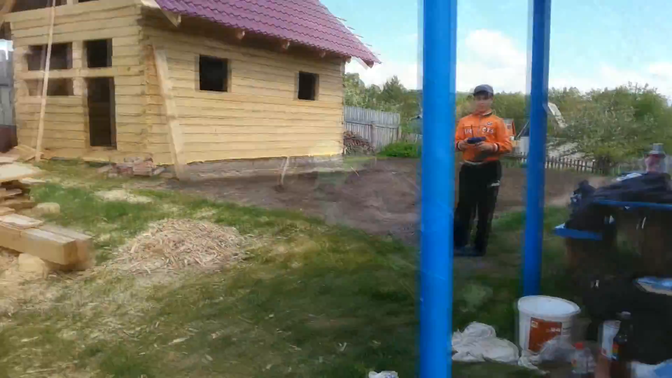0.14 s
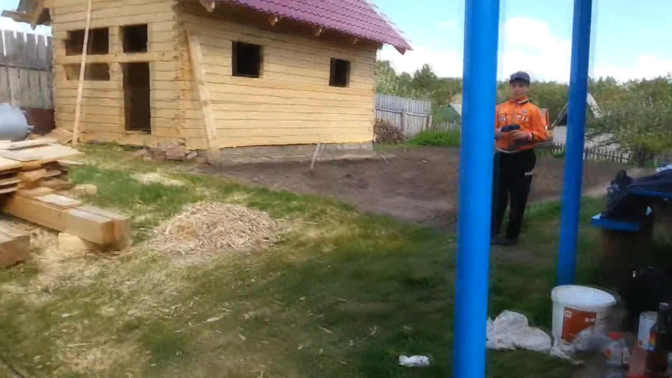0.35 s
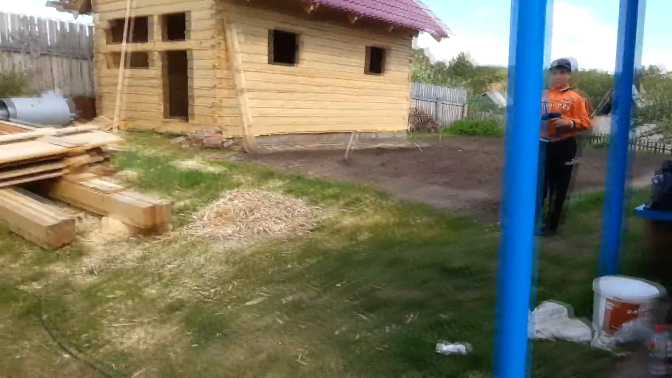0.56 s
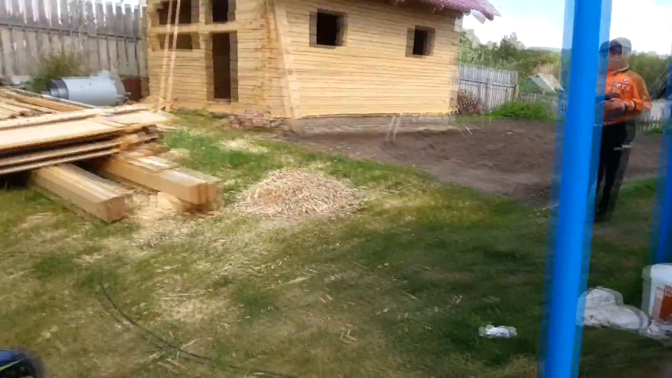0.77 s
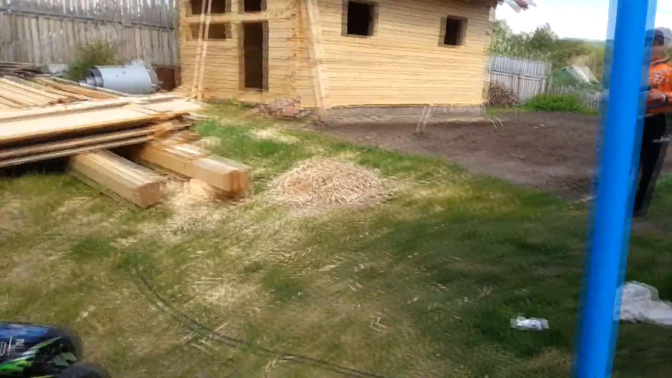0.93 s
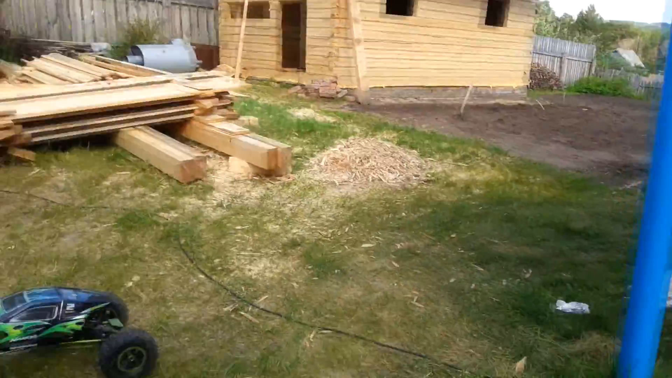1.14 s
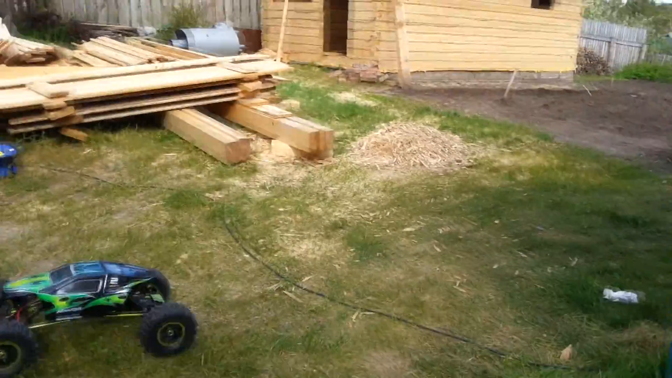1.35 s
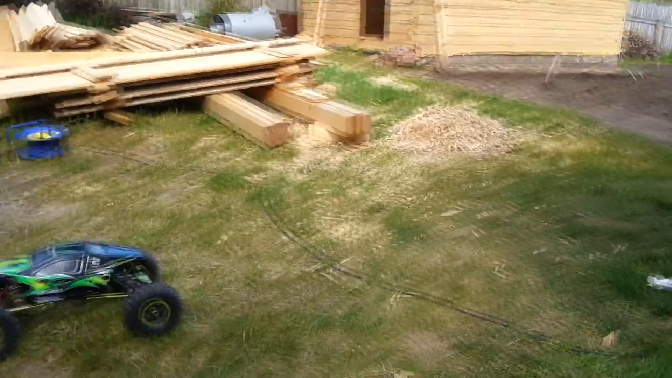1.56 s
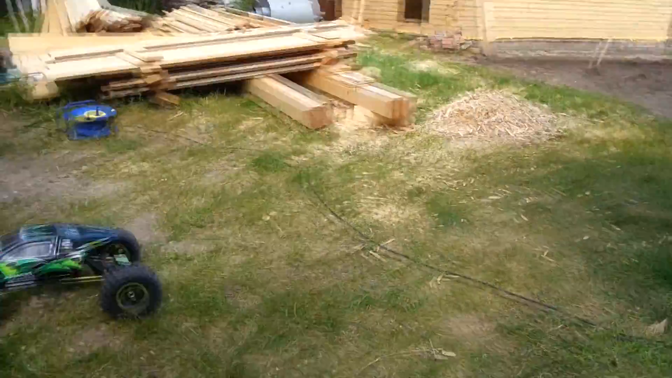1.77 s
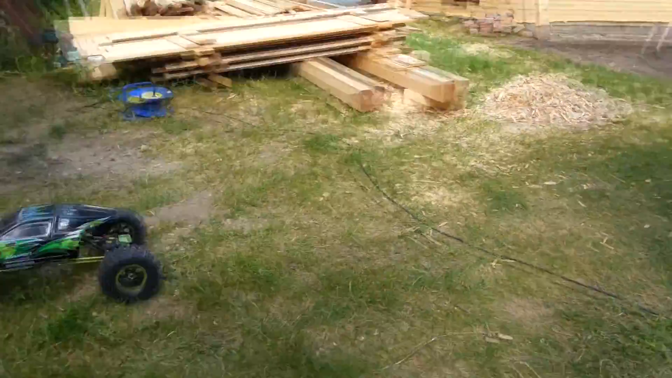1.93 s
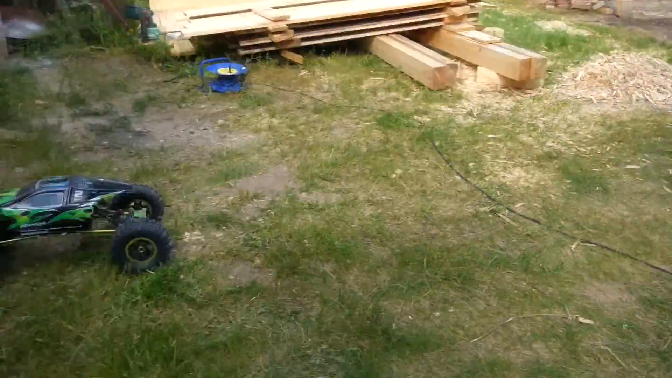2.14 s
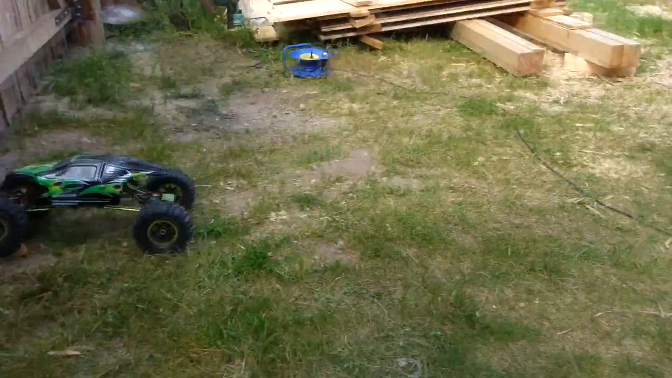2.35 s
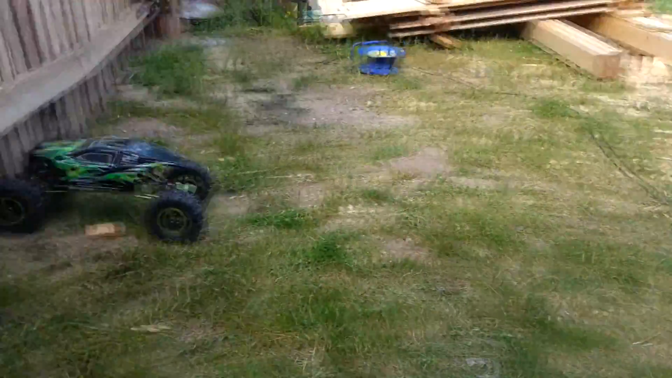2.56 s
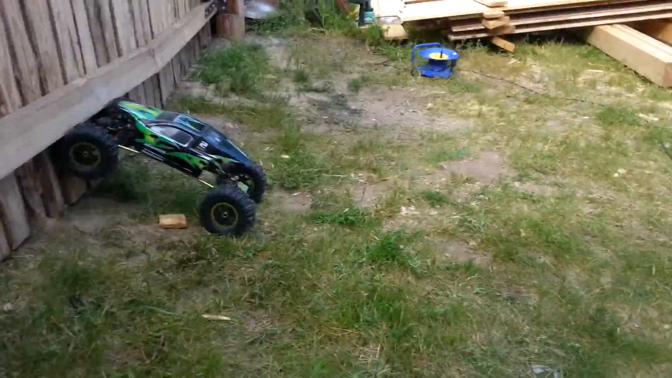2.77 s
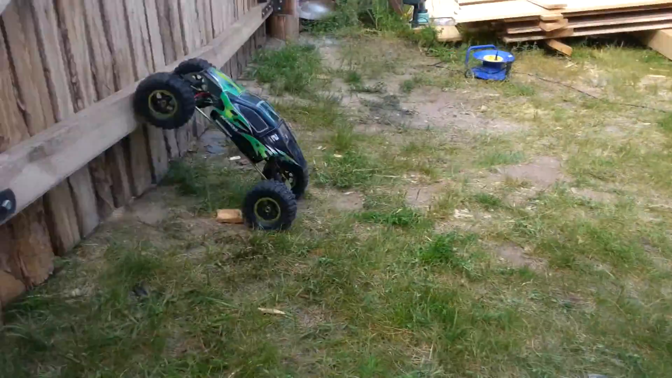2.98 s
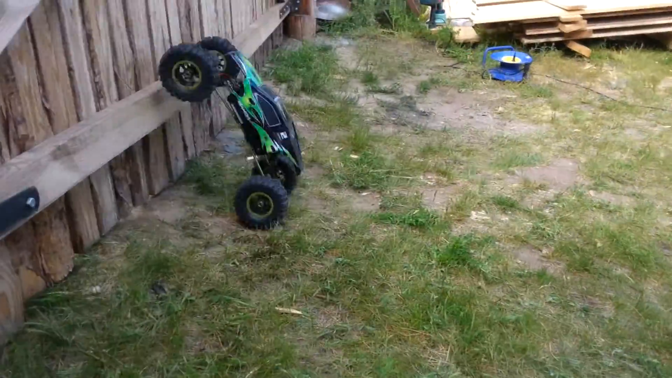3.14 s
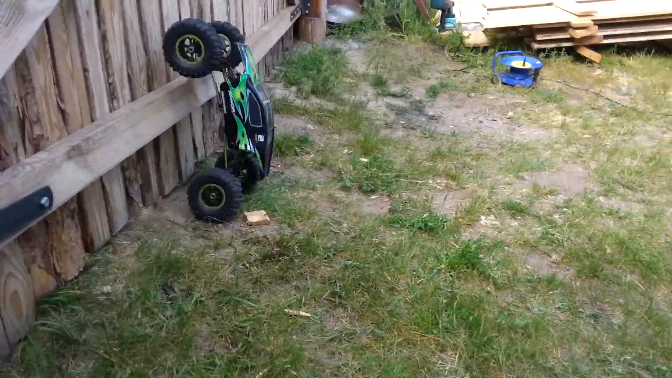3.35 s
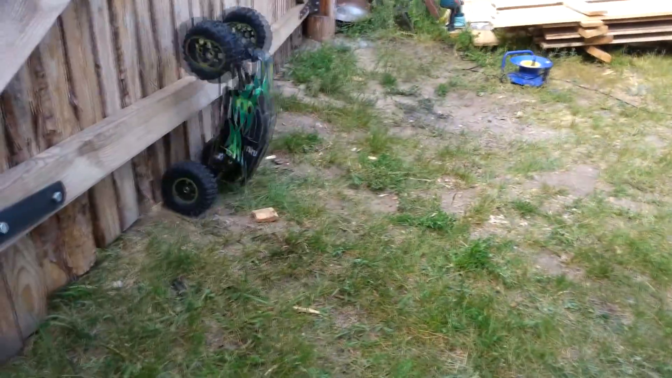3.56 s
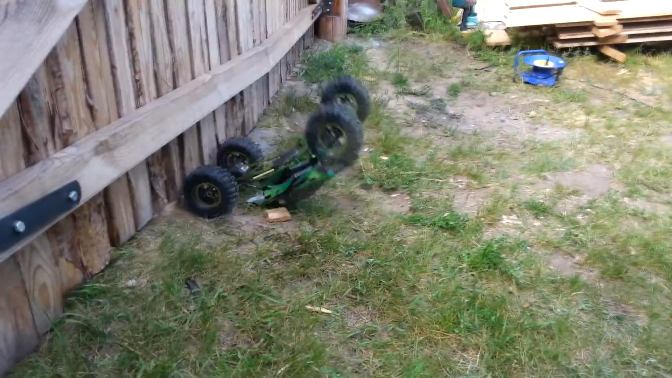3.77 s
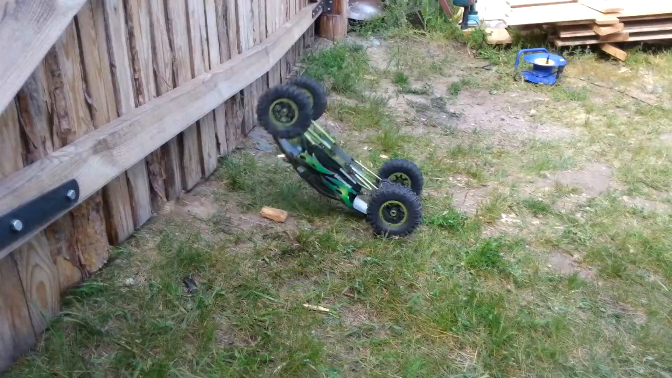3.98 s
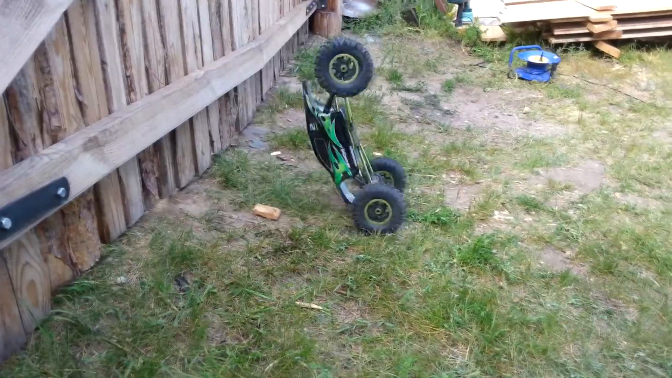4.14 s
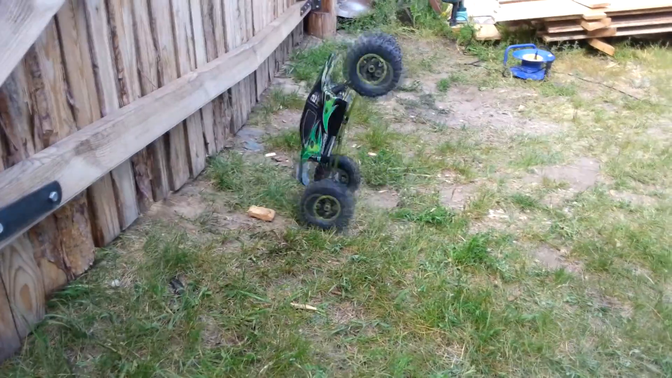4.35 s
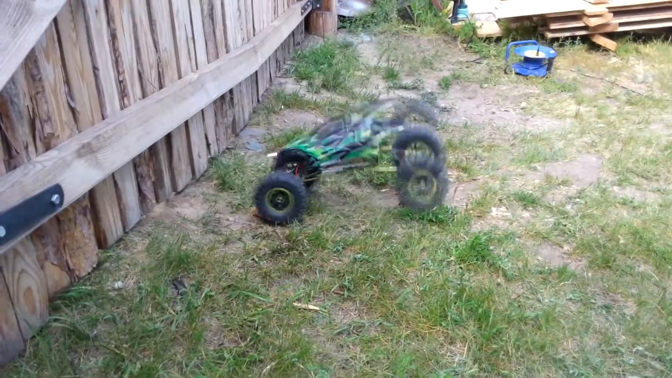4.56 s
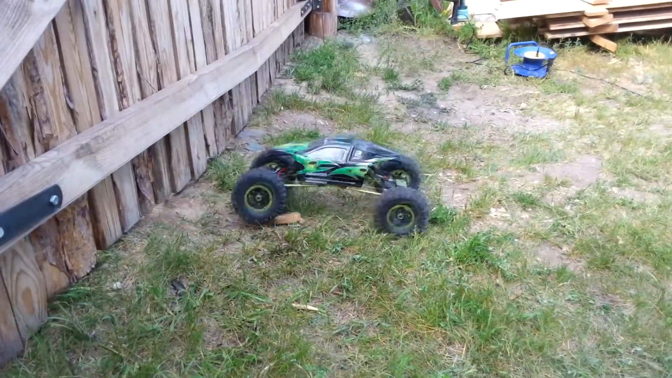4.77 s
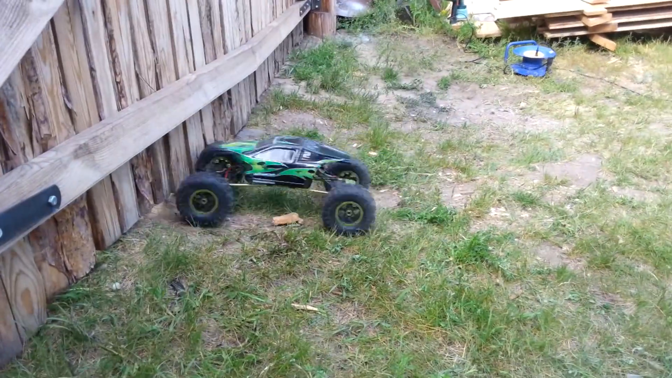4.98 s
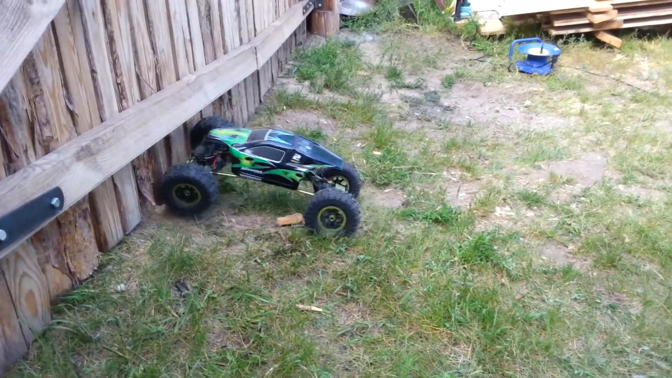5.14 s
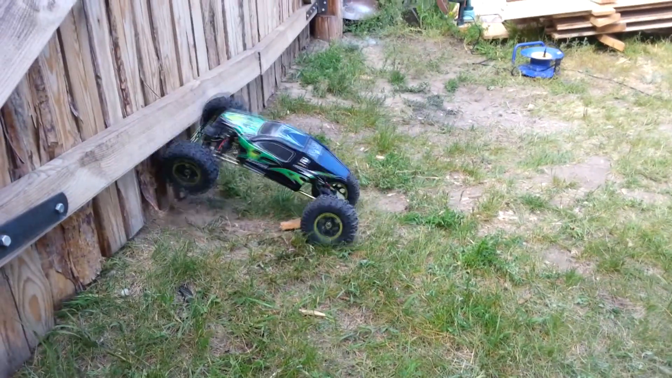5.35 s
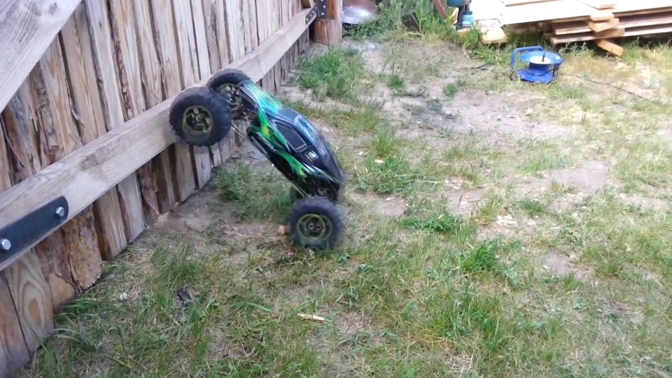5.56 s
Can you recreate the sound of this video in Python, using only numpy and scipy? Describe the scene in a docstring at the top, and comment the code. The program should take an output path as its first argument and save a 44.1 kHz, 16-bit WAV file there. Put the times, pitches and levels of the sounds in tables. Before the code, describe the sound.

A brief whirr fades under puffs of wind on the microphone. A small radio-controlled truck then drives up close, its electric gears making a high, wavering whine over a rough grind and tyres scuffing dry grass. It thuds into a wooden fence and keeps scrabbling, with hollow knocks, sharp plastic clicks and rattles as it tumbles and lands, then bumps the fence again. Faint outdoor air lies behind.

```python
"""Outdoors, on dry grass by a wooden fence. A whirr fades; then a small electric crawler truck drives
close, climbs the fence, tumbles and lands. Its meshing gear teeth whine over a rough grind, modulated
once per shaft turn and comb-filtered by the ground reflection. Impacts excite the damped modes of the
plastic shell and of the wood, and gusts puff on the two microphone ports."""
import sys
import numpy as np
from scipy import signal
from scipy.fft import rfft, irfft, next_fast_len
from scipy.io import wavfile
from scipy.ndimage import uniform_filter1d

SR = 44100
rng = np.random.default_rng(int(sys.argv[2]) if len(sys.argv) > 2 else 0)


def log_audio(samples):
    """Write samples as a 16-bit WAV file to the path given in sys.argv[1]."""
    # one column per channel
    frames = np.atleast_2d(samples).T
    # limit to full scale, then quantise
    limited = np.clip(frames, -1, 1)
    pcm = np.round(limited * 32767).astype(np.int16)
    wavfile.write(sys.argv[1], SR, pcm)


N = 247401

# Spectrum of the distant air: frequency_hz, gain_db
AIR_SPECTRUM = [(24, -48), (40, 1), (342, -1), (426, 1.5), (471, 0.5), (573, -1), (733, 1), (6110, -14.5),
                (14500, -12.5)]
# Turbulent rumble on the ports: time_s, left_db, right_db
WIND_LEVELS = [(0.0, -31.5, -59), (0.15, -38.5, -34), (0.4, -62.5, -56.5), (0.8, -67, -73), (1.2, -64, -63),
               (1.3, -40.5, -60), (1.6, -73, -47), (2.0, -49.5, -46), (2.2, -77, -52), (2.6, -60, -52),
               (2.8, -58, -47), (3.5, -69, -46.5), (3.8, -50, -48.5), (4.1, -58, -44.5), (4.35, -88, -66),
               (4.6, -64, -58), (4.7, -58, -39.5), (4.85, -56, -52), (5.3, -62, -49), (5.6, -42, -42.5)]
# Strongest gust eddies: centre_s, level_db, pitch_hz, port (1 left, -1 right)
EDDIES = [(0.027, -28.5, 316, 1), (0.088, -20.5, 315, 1), (0.107, -19, 415, 1), (0.132, -13, 305, -1),
          (0.174, -26, 223, 1), (0.196, -36, 250, -1), (0.224, -20, 239, -1), (0.277, -19, 343, -1),
          (0.329, -36.5, 188, -1), (0.358, -39.5, 200, -1), (0.376, -42, 200, -1), (1.242, -34.5, 130, 1),
          (1.375, -31, 212, 1), (1.596, -28.5, 210.3, -1), (1.629, -34.5, 235, 1), (1.71, -29.5, 220, -1),
          (1.879, -29.5, 182, -1), (1.96, -20.5, 243, -1), (2.758, -33, 259.2, -1), (2.945, -30, 247, -1),
          (3.083, -32.5, 175, -1), (3.151, -31.5, 210, -1), (3.315, -23, 261.6, -1), (3.401, -26, 257, -1),
          (3.445, -33, 198, -1), (3.681, -20, 214.7, -1), (3.815, -28, 213, -1), (3.918, -33.5, 214, -1),
          (4.097, -32, 205, -1), (4.5, -39.5, 263.7, -1), (4.889, -32, 248, -1), (5.201, -36.5, 208.4, -1),
          (5.389, -29, 212.9, -1), (5.499, -27.5, 235.3, -1), (5.558, -25, 268, 1), (5.58, -31, 204.5, 1)]

# Decay of the opening whirr: time_s, level_db
WHIRR_LEVELS = [(0.0, -41), (0.282, -43.5), (0.64, -57), (0.664, -61), (0.8, -74)]
# Its spectrum: frequency_hz, gain_db
WHIRR_SPECTRUM = [(290, -26), (500, -21), (609, -18), (1030, -11), (1440, -16), (1680, -10), (2260, -10.5),
                  (2670, -5.5), (3850, -9), (5180, -10.5), (6310, -14.5), (10000, -18), (14500, -40)]
# Its resonances: pitch_hz, width_hz, gain_db
WHIRR_MODES = [(890, 270, 4.5), (1690, 74, 3.5), (2690, 70, -0.5), (3070, 50, -2), (3500, 60, -2.5),
               (4280, 73, 1), (4960, 90, 2), (5320, 52, -1)]

# Impacts of the tyres on the fence boards and of the bumper on the rail: start_s, level_db
TYRE_KNOCKS = [(2.79, -34), (2.965, -29), (3.003, -34), (3.505, -25), (3.642, -30), (3.724, -32),
               (3.941, -16), (4.676, -26), (4.686, -21), (5.277, -36), (5.29, -32.5), (5.303, -34),
               (5.431, -31.5), (5.467, -31), (5.474, -35), (5.5, -36), (5.52, -32), (5.53, -43)]
BUMPER_THUDS = [(2.566, -30), (2.5785, -18.5), (2.585, -20.5), (2.634, -33), (2.82, -32), (2.839, -28),
                (2.845, -24.5), (3.6575, -19.5), (3.843, -17), (3.861, -17), (4.69, -23)]
# Modes of the boards, the hollow rail and the plastic shell: pitch_hz, width_hz, gain_db
BOARD_MODES = [(875, 48, -8.5), (952, 180, -6), (1230, 160, -15)]
RAIL_MODES = [(537, 92, -4), (673, 150, -11)]
SHELL_MODES = [(232, 180, -1.5), (358.3, 17.8, -10), (516, 167, 4), (718, 67, -11.5), (837, 72, -2),
               (1110, 450, -18.5), (1650, 460, -1.5), (2370, 470, 0.5), (2466, 284, -1), (3310, 380, -6),
               (3970, 430, -5.5), (5000, 840, -8), (5400, 390, -13), (8200, 2100, -23)]
# Blows on the shell: start_s, level_db, scrape_over_push_db
SHELL_BLOWS = [(2.579, -23, 0), (2.838, -34, 8.5), (2.964, -30.5, -2), (3.01, -30, 3), (3.503, -26.5, -2),
               (3.698, -44, 9), (3.769, -28.5, -10), (3.84, -21.5, -7), (3.858, -17, 0.5),
               (3.889, -24.5, 13), (3.908, -19.5, -17), (3.941, -21, 2), (3.962, -24, 8),
               (4.662, -29.5, 13), (4.671, -23, 11), (4.68, -15, -4.5), (4.685, -26, -19), (4.697, -17, -1),
               (4.709, -19, -5), (4.714, -32, -11), (4.741, -35, 15.5), (4.84, -40.5, 16), (4.861, -28, 5),
               (5.072, -29.5, 4), (5.082, -32, -5), (5.301, -37, 9.5), (5.431, -37, 12), (5.47, -31, -2)]
# Rattling after a bump: start_s, hold_s, level_db, brightness_db
SHELL_RATTLES = [(2.535, 0.027, -43.5, -13), (2.578, 0.019, -38, 6.5), (2.634, 0.098, -48, 10),
                 (2.769, 0.072, -43.5, 1), (2.835, 0.012, -39.5, -1), (2.951, 0.089, -44, -9),
                 (3.494, 0.16, -40.5, -22), (3.647, 0.032, -34, -6), (3.712, 0.17, -41.5, -15),
                 (3.848, 0.042, -31.5, -10), (3.955, 0.048, -39, 7), (4.656, 0.049, -30, -7),
                 (4.727, 0.026, -47, -3), (4.837, 0.049, -42, -8), (5.034, 0.054, -41.5, -4),
                 (5.121, 0.08, -53, 8), (5.237, 0.064, -43, -3), (5.455, 0.053, -43.5, 0)]
# Dry cracks of hard plastic, and from 4.80 s brief clicks of meshing gear teeth: start_s, level_db, top_hz
SHARP_TICKS = [(0.8743, -33, 5100), (1.231, -36, 5200), (2.579, -28, 6100), (2.675, -17, 5020),
               (3.657, -21, 5000), (3.933, -25, 3980), (3.858, -22, 2190), (3.892, -17, 2190),
               (3.9421, -28, 7100), (3.9406, -2, 5100), (3.9438, -4, 4170), (3.946, -18, 4970),
               (4.48, -22, 3780), (4.799, -30, 5000), (4.811, -23, 4060), (4.833, -21, 4450),
               (4.842, -26, 4000), ]

# Gear squeaks: start_s, length_s, pitch_hz, level_db
GEAR_SQUEAKS = [(2.996, 0.032, 7890, -42), (3.04, .05, 7560, -52), (4.034, 0.069, 5960, -40.5),
                (4.061, 0.027, 6680, -48), (1.408, 0.059, 3190, -39.5), (3.213, .012, 3170, -33),
                (3.39, .04, 1660, -40), (3.697, 0.0066, 3030, -22.5), (4.215, .012, 3500, -31),
                (4.478, 0.008, 3100, -30.5), (4.532, 0.032, 2360, -38.5)]
# Speed and load of the drive: time_s, mesh_hz, grind_swell_db, whine_swell_db, tyre_swell_db
DRIVE = [(0.8, 2880, -2, -6, 4), (1.0, 2910, -9, 3, 5), (1.12, 3095, 5, 8, 8), (1.21, 3157, -4, 6, 13),
         (1.29, 2894, 0.5, 7, 8), (1.36, 2740, -3, 2, 7), (1.43, 2738, 3.5, -7, 5), (1.48, 2748, 3, 2.5, 3),
         (1.56, 2784, 2, 4, 0), (1.65, 2940, 1, -5.5, -2), (1.88, 2945, 1.5, -5.5, -0.5),
         (2.17, 3000, -0.3, -3.5, 0), (2.49, 3077, -0.5, -33, 0.5), (2.6, 2844, 3.5, -8, 6.5),
         (2.9, 2890, -6, -32, 1.5), (3.02, 3123, -0.5, 9, 3.5), (3.08, 3112, 0.5, 0, 0),
         (3.15, 3080, 1.5, 6, 0), (3.23, 3160, -0.5, 10.5, 0.5), (3.31, 3120, 0.5, 4.5, -2.5),
         (3.38, 3176, 0, 8, -1), (3.45, 3090, 0, 11, -2.5), (3.6, 3073, -2, 0, 5.5), (3.66, 3118, 4, 17, 0),
         (3.71, 3058, 3.5, 16, 4.5), (3.83, 3078, 1.5, 9.5, -4), (4.0, 2986, 4, 12, 8),
         (4.12, 2966, -0.5, 4, 0.5), (4.18, 2788, -1.5, 8.5, 0), (4.24, 2849, 1, 9, -2.5),
         (4.35, 2975, -3.5, 6, -1.5), (4.45, 3055, -0.5, 12, -6), (4.55, 3050, -1, 6.5, -4.5),
         (4.64, 3012, -2, 1.5, -7), (4.79, 3030, 4, 4.5, -1), (4.92, 3020, 0, -6, 0.5),
         (5.05, 3015, 0.5, 11.5, 1.5), (5.15, 3110, 0.5, -6, 6.5), (5.25, 3147, 1, 9, 4.5),
         (5.38, 2866, 2, -6, 6.5), (5.61, 3140, 14.5, 4, 7)]
# Gain with the truck's nearness: time_s, gain_db
NEARNESS = [(0.8, -28), (1.0, -24.5), (1.21, -26), (1.38, -3), (1.54, 1), (5.0, 2.5), (5.61, -8)]
# Two overlapping groups of gear tones, mostly high and mostly low: mesh_ratio, gain_db
MOSTLY_HIGH_TONES = [(.76, -9), (1.121, -11), (1.41, -1.5), (1.52, -4), (1.62, -1.5), (1.68, -6.5),
                     (1.75, -8), (1.98, -15)]
MOSTLY_LOW_TONES = [(.53, -1.5), (.57, -12.5), (.62, 0.5), (.78, -4)]
# Each group's own loudness curve: time_s, mostly_high_db, mostly_low_db
GROUP_LEVELS = [(0.8, -45, -39), (1.2, -32.5, -38), (1.45, -48, -44.5), (1.58, -38.5, -47),
                (1.8, -39, -45.5), (2.2, -38.5, -49), (2.5, -37, -46), (2.7, -58, -44), (2.9, -45.5, -49),
                (3.1, -43.5, -39), (3.25, -42, -39), (3.41, -42, -43), (3.55, -41, -44), (3.75, -43, -43.5),
                (4.0, -45, -38), (4.2, -45, -47.5), (4.33, -42.5, -43.5), (4.45, -45.5, -43.5),
                (4.6, -44, -46.5), (4.8, -39, -42), (5.05, -39.5, -44), (5.3, -46.5, -44),
                (5.61, -51, -32.5)]
# Spectra of the tyre scuff and of the grind's middle and treble: frequency_hz, gain_db
TYRE_SPECTRUM = [(180, 2.5), (300, -12.5), (390, -7), (646, 2), (871, -2.5), (1060, 1), (1480, -4.5),
                 (1840, -5), (2570, -6), (2800, -7), (3640, -3), (6160, -120)]
MID_SPECTRUM = [(1400, -60), (2300, -3.5), (2900, 1), (3300, 2.5), (3600, -2), (3900, 1.5), (4300, -0.5),
                (4600, -2), (5100, -10), (5500, -5), (6200, -34), (7500, -26), (12000, -90)]
TREBLE_SPECTRUM = [(3410, -33), (5800, 0), (8380, -6.5), (10100, -5.5), (10900, -10.5), (13400, -12.5),
                   (14500, -11)]

# Reflection off the soil: time_s, delay_ms, amplitude_ratio
GROUND_ECHO = [(0.8, 1, .3), (1.3, 1.1, 0), (1.55, 1.01, 0.3), (1.8, 0.98, 0.17), (2.2, 0.96, 0.26),
               (2.5, 1.08, 0.06), (2.8, 1.04, 0.17), (3.3, 1.04, 0.08), (4.0, 0.956, 0), (4.4, 1, 0.27),
               (4.8, 0.93, 0.14), (5.61, 1.27, 0)]
# Later arrival at the left port: time_s, delay_ms
LEFT_DELAY = [(0, 0.051), (.8, 0.025), (1.2, 0.28), (1.8, 0.36), (2.3, 0.32), (2.8, 0.25), (3.8, 0.16),
              (4.3, 0.24), (4.7, 0.11), (5.6, 0.14)]
# Balance of the ports: frequency_hz, left_over_right_db
PORT_BALANCE = [(60, 4), (110, -5), (200, 3), (370, -2), (680, 0), (1240, 4), (2280, 6.5), (4170, 0.5),
                (7650, -5.5), (14000, -5)]
# Noise power common to both ports: frequency_hz, shared_fraction
PORT_COHERENCE = [(200, 1), (700, 0.8), (1500, 0.51), (3000, 0.018), (6000, 0.021), (14000, 0.092)]

FFT_SIZE = next_fast_len(N)
BIN_HZ = np.arange(FFT_SIZE // 2 + 1) * SR / FFT_SIZE + 1   # offset keeps the logarithm finite
TIME_S = np.arange(N) / SR


def from_db(db):
    """Amplitude grows tenfold for every 20 dB."""
    return 10 ** (np.asarray(db) / 20)


def unit_rms(x):
    """Normalisation to a mean power of 1."""
    return x / np.sqrt(np.mean(x ** 2) + 1e-20)


def in_time(rows, outside=None):
    """Linear interpolation of each column over time."""
    times, *columns = np.transpose(rows)
    return [np.interp(TIME_S, times, column, outside, outside) for column in columns]


def per_bin(spectrum):
    """Interpolation of a spectrum on a log-frequency axis."""
    hz, values = np.transpose(spectrum)
    return np.interp(np.log(BIN_HZ), np.log(hz), values)


def colour(x, spectrum, share=1):
    """Zero-phase filtering by a smooth spectrum."""
    return irfft(rfft(x, FFT_SIZE) * from_db(share * per_bin(spectrum)), FFT_SIZE)[..., :N]


def filtered(x, kind, hz, order=2):
    """A filter with a maximally flat passband."""
    return signal.sosfilt(signal.butter(order, hz, kind, fs=SR, output="sos"), x)


def drift(rate_hz):
    """Low-passed noise gives a random fluctuation of rms 1."""
    step, settle = 40, 2000
    pole = np.exp(-2 * np.pi * step * rate_hz / SR)
    noise = rng.standard_normal(N // step + settle + 2)
    slow = signal.lfilter([1], [1, -2 * pole, pole * pole], noise)[settle:]
    return np.interp(np.arange(N) / step, np.arange(len(slow)), unit_rms(slow))


def resonate(x, hz, width_hz):
    """A damped oscillator with unit gain at resonance."""
    r = np.exp(-np.pi * width_hz / SR)
    gain = (1 - r * r) / 2
    return signal.lfilter([gain, 0, -gain], [1, -2 * r * np.cos(2 * np.pi * hz / SR), r * r], x)


def port_noise():
    """White noise at two spaced ports is coherent in the bass and nearly incoherent in the treble."""
    shared = np.clip(per_bin(PORT_COHERENCE), 0, 1)
    common, *own = rfft(rng.standard_normal((3, N)), FFT_SIZE)
    return irfft(np.sqrt(shared) * common + np.sqrt(1 - shared) * np.array(own), FFT_SIZE)[:, :N]


def distant_air():
    """Stationary broadband noise forms the outdoor background."""
    return from_db(-59.5) * unit_rms(colour(port_noise(), AIR_SPECTRUM))


def wind():
    """Turbulence is local: each port has its own rumble and its own eddies of a cycle or two."""
    rumble = [filtered(rng.standard_normal(N), "band", [90, 320]) * from_db(3.5 * drift(25))
              for _ in range(2)]
    out = from_db(in_time(WIND_LEVELS)) * [unit_rms(side) for side in rumble]
    offsets = np.arange(-800, 800)
    t = offsets / SR
    for (centre_s, db, hz, port), phase in zip(EDDIES, rng.random((len(EDDIES), 2))):
        at = np.clip(round(centre_s * SR) + offsets, 0, N - 1)
        swell = np.exp(-(t * hz / np.where(t < 0, .8, 1.2)) ** 2)
        fundamental = np.cos(2 * np.pi * (hz * t + phase[0]))
        overtone = from_db(-8.5) * swell * np.cos(2 * np.pi * (1.96 * hz * t + phase[1]))
        out[int(port < 0), at] += from_db(db) * swell * (fundamental + overtone)
    return out


def throb(shaft_hz, sharpness, uneven_db):
    """Amplitude modulation: an eccentric gear bites once a turn, each time with its own strength."""
    turns = np.cumsum(shaft_hz * (1 + 0.034 * drift(16.8))) / SR
    strength = from_db(uneven_db * rng.standard_normal(1000))[turns.astype(int)]
    return unit_rms(strength * np.exp(-sharpness * np.cos(2 * np.pi * turns)))


def fading_whirr():
    """Forced vibration: throbbing gear noise drives steady resonances and dies away."""
    teeth = port_noise() * (1 + .35 * throb(shaft_hz=67.8, sharpness=1.0, uneven_db=3.6))
    rings = sum(from_db(db + 2.5) * resonate(teeth, hz, width) for hz, width, db in WHIRR_MODES)
    level_db, = in_time(WHIRR_LEVELS, outside=-120)
    return from_db(level_db) * unit_rms(colour(teeth + rings, WHIRR_SPECTRUM))


def fence(knocks, modes):
    """Impulse response of wood: soft knocks excite each damped mode with a random strength."""
    start_s, level_db = np.transpose(knocks)
    out = 0
    for (hz, width, db), spread in zip(modes, rng.standard_normal((len(knocks), len(modes))).T):
        push = np.full(N, 1e-18)
        push[np.round(start_s * SR).astype(int)] = from_db(level_db + db + 2 * spread)
        ring = resonate(push, hz, width) * SR / width / np.pi
        out = out + resonate(ring, hz, width_hz=450)   # softens the attack
    return out


def sharp_ticks():
    """Brief contact gives a broad spectrum: a snap, then noise that decays in milliseconds."""
    decay_s, snap_db, low_hz = .0021, 5, 880
    out, t = np.zeros((2, N)), np.arange(800) / SR
    noises = rng.standard_normal((len(SHARP_TICKS), 3, len(t)))
    for (start_s, db, top_hz), noise in zip(SHARP_TICKS, noises):
        burst = from_db(db) * np.exp(-t / decay_s) * (0.21 * noise[0] + 0.55 * noise[1:])
        burst[:, :3] = from_db(db + snap_db) * np.array([1, 1, -1])
        at = round(start_s * SR)
        out[:, at:at + len(t)] += filtered(burst, "band", [low_hz, top_hz], order=3)
    return out


def rattle_envelopes():
    """Each rattle rises, holds and decays exponentially; one row for low modes, one for high."""
    rise_db_per_s, fall_db_per_s = 1800, 417
    out = 0
    for start_s, hold_s, db, bright_db in SHELL_RATTLES:
        rise_db = rise_db_per_s * (TIME_S - start_s)
        fall_db = fall_db_per_s * (start_s + hold_s - TIME_S)
        out = out + from_db(db + np.minimum(rise_db, fall_db).clip(None, 0) + [[0], [bright_db]])
    return out


def plastic_shell():
    """Modal superposition: dense rattling knocks and single blows excite the same resonances."""
    knocks_per_s, scrape_s = 700, 0.009
    rattle = rattle_envelopes()
    impulses = rng.random(N) < knocks_per_s / SR
    impulses = impulses * from_db(0.42 * np.minimum(rng.exponential(1, N), 4))
    knocks = np.sqrt(signal.lfilter([1], [1, -.97], impulses ** 2)) * port_noise()
    start_s, level_db, scrape_db = np.transpose(SHELL_BLOWS)
    blows = np.full((2, N), 1e-18)
    blows[:, np.round(start_s * SR).astype(int)] = from_db([level_db, level_db + scrape_db])
    scrape = signal.lfilter([.15], [1, -np.exp(-1 / (scrape_s * SR))], blows[1]) * port_noise()
    push = filtered(blows[0], "low", 2800)   # rubber and plastic give, so the push is soft
    out = 0
    for k, (hz, width, db) in enumerate(SHELL_MODES):
        high = int(hz > 1400)
        chatter = unit_rms(resonate(knocks, hz, width)) * rattle[high]
        spread = from_db(2.5 * drift(30))   # each blow lands elsewhere on the mode
        hits = resonate((scrape if high else push) * spread, hz, 0.69 * width) * SR / width / np.pi
        out = out + from_db(db) * (-1) ** k * (from_db(-4.5) * chatter + from_db(-8.0) * hits)
    return filtered(out, "high", 150)   # the shell is too small to radiate bass


def mesh_tone(hz, wander_rad, stereo_rad):
    """Phase modulation: play in the gears blurs a tooth tone, a little differently at each port."""
    phase = np.cumsum(2 * np.pi * hz / SR) + wander_rad * drift(56.4)
    return np.sin(phase + stereo_rad * drift(70) * [[1], [-1]])


def gear_squeaks():
    """Jumps in load draw short tone bursts from the gears, roughened by phase noise."""
    out = 0
    for start_s, length_s, hz, db in GEAR_SQUEAKS:
        envelope = np.exp(-(2 * (TIME_S - start_s) / length_s - 1) ** 4)
        out = out + from_db(db) * envelope * mesh_tone(np.full(N, hz), wander_rad=1.7, stereo_rad=1)
    return out


def gear_tones(group, mesh_hz):
    """Coupled gears sound at constant ratios to the main mesh, each tone swelling on its own."""
    return sum(from_db(db + 2.6 * drift(8.8)) * mesh_tone(ratio * mesh_hz, wander_rad=2.4, stereo_rad=1)
               for ratio, db in group)


def band_fading(x, depth, count=8):
    """Selective fading: bands swell and sink at random, as when the chassis turns and its echo shifts."""
    position = count * np.log(BIN_HZ / 250) / np.log(60)   # band centres from 250 Hz to 15 kHz
    spectrum, out = rfft(x, FFT_SIZE), 0
    for k in range(count + 1):
        band = irfft(spectrum * np.clip(1 - abs(position - k), 0, 1), FFT_SIZE)[:, :N]
        out = out + band * from_db(depth * (0.1 * drift(1.6) + 0.7 * drift(9.9)))
    return out


def gear_drive():
    """Periodic tooth contact whines over grind and tyre scuff, all modulated at the shaft rate."""
    teeth, waver_db = 36, 1.5
    mesh_hz, swell_db, load_db, scuff_db = in_time(DRIVE)
    near_db, = in_time(NEARNESS)
    mostly_high_db, mostly_low_db = in_time(GROUP_LEVELS)
    mesh_hz = uniform_filter1d(mesh_hz, size=3000)   # the pitch glides smoothly, without sudden jumps
    fade_in = np.clip((TIME_S - DRIVE[0][0]) / 0.03, 0, 1)
    bite = throb(mesh_hz / teeth, sharpness=0.73, uneven_db=1.0)
    clear = mesh_tone(mesh_hz, wander_rad=.8, stereo_rad=.3)
    blurred = mesh_tone(mesh_hz, wander_rad=4, stereo_rad=.6)
    whine = from_db(-46 + load_db + waver_db * drift(27)) * bite * (clear + .6 * blurred)
    mostly_high = from_db(mostly_high_db) * gear_tones(MOSTLY_HIGH_TONES, mesh_hz)
    mostly_low = from_db(mostly_low_db) * gear_tones(MOSTLY_LOW_TONES, mesh_hz)
    tones = (0.39 + 0.069 * bite) * (mostly_high + mostly_low)
    rough = (1 + 0.4 * bite) * from_db(1.44 * drift(260)) * port_noise()
    layers = [(-47.5 + scuff_db, TYRE_SPECTRUM),
              (-45.5 + swell_db, MID_SPECTRUM),
              (-47 + 0.76 * swell_db + 0.086 * near_db, TREBLE_SPECTRUM)]   # distance dulls the treble
    grind = sum(from_db(db) * unit_rms(colour(rough, spectrum)) for db, spectrum in layers)
    return fade_in * from_db(near_db) * (whine + tones + band_fading(grind, depth=2.14))


def ground_reflection(x):
    """Interference of the direct sound with its echo off hard dry soil forms a comb filter."""
    delay_ms, strength = in_time(GROUND_ECHO)
    echo = np.array([np.interp(TIME_S - delay_ms / 1000, TIME_S, side) for side in x])
    return x + strength * echo


def at_ports(x):
    """Time and level cues: the left port hears the truck later and in another colour."""
    delay_ms, = in_time(LEFT_DELAY)
    left = np.interp(TIME_S - delay_ms / 1000, TIME_S, x[0])
    return np.array([colour(left, PORT_BALANCE, share=.5), colour(x[1], PORT_BALANCE, share=-.5)])


def scene():
    """Superposition of distant air, wind and the truck at the two ports."""
    air = distant_air()
    truck = ground_reflection(gear_drive()) + fading_whirr() + plastic_shell()
    wood = fence(TYRE_KNOCKS, BOARD_MODES) + fence(BUMPER_THUDS, RAIL_MODES)
    return air + at_ports(truck + wood + sharp_ticks() + gear_squeaks()) + wind()


def record(dry):
    """Soft saturation rounds the highest peaks, and a steep low-pass cuts the top."""
    ceiling, stop_hz = .45, 14750
    rounded = ceiling * np.tanh(dry / ceiling)
    return signal.sosfilt(signal.cheby2(12, 70, stop_hz, fs=SR, output="sos"), rounded)


dry = scene()
out = record(dry)
log_audio(out)
```